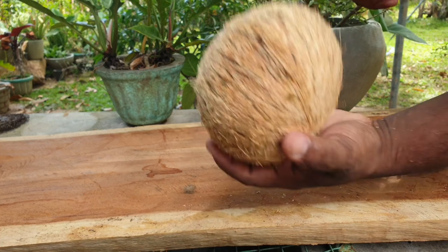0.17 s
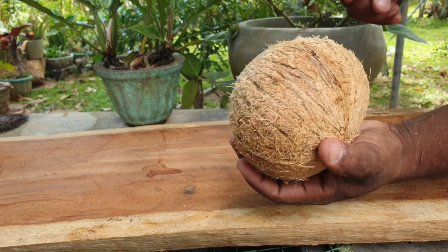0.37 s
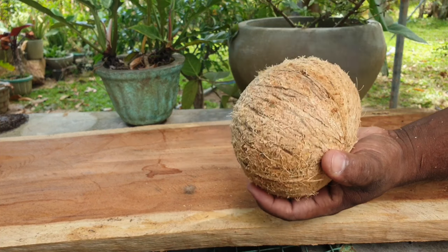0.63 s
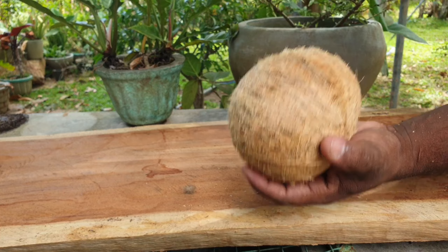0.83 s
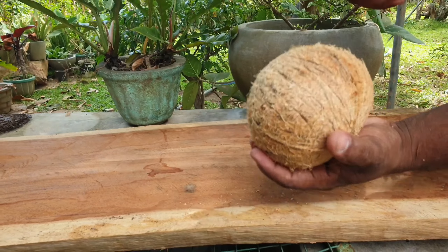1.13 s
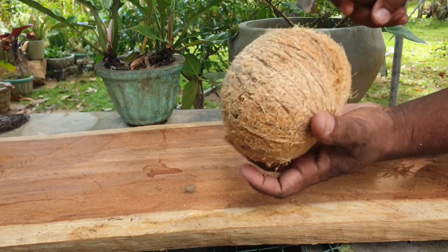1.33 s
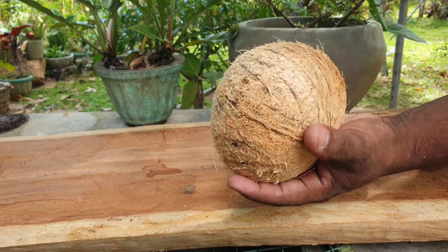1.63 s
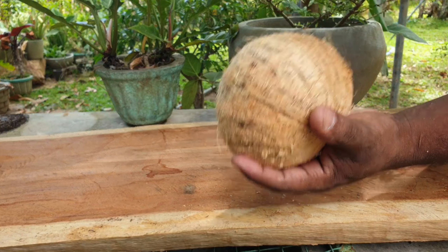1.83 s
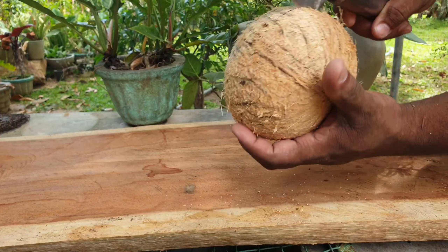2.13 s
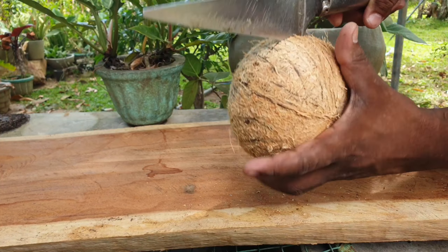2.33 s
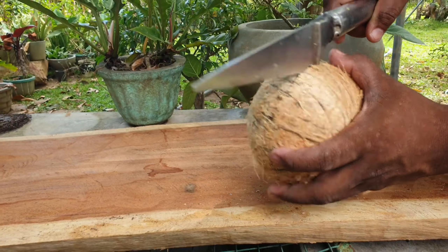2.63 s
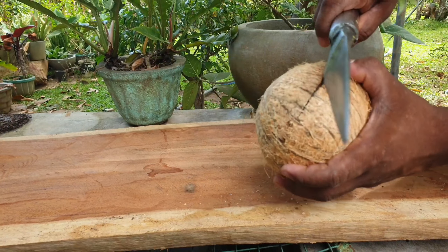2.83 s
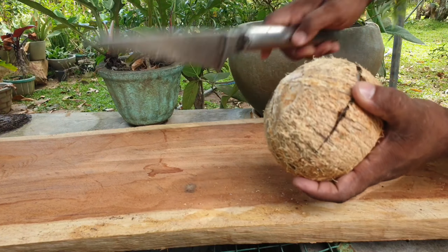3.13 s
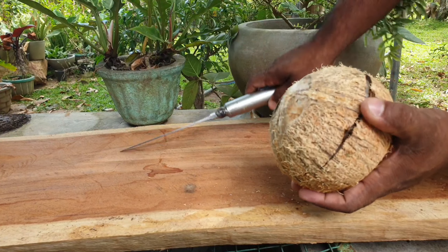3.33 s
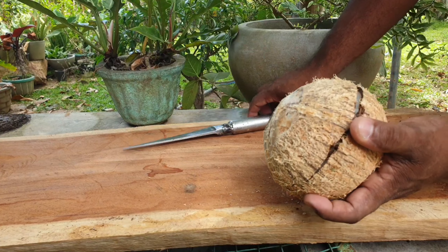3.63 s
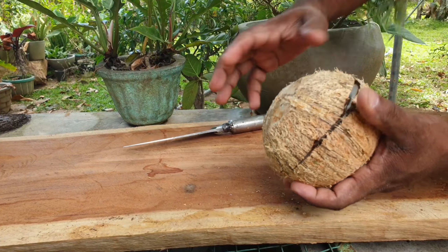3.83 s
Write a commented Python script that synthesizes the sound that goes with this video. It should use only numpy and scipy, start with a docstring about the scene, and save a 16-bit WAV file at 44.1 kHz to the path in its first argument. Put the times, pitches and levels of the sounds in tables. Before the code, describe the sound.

Knife chopping a coconut, close, on a covered porch. A previous blow's hollow ring fades at the start; a faint knock comes at 0.6 s, then hard cracks at 1.0 and 2.0 s, the second more hollow, with quick echoes. Tiny ticks and husk rustles follow, with creaks around 2.8-3.1 s. From 3.45 s the blade ticks and slides, thumping and bouncing on wood at 3.7-3.9 s. Faint garden hiss and wavering low hum throughout.

```python
"""Garden hiss and a wavering low hum run throughout; the tail of an earlier knife blow on a coconut rings first.
A faint knock and thin fizz follow, then two hard chops; each joins a noise crack to ringing shell, blade and pot.
Ticks and husk rustle (filtered noise) lie between; the blade creaks in the crack as rough pulses of noise.
Last, the knife slides and bounces on a wooden plank: fading tones of wood and steel, with noise for the contact.
A covered porch answers the knocks with a few hard echoes and a dense noise tail."""
import sys
import numpy as np
from scipy import signal
from scipy.fft import rfft, irfft
from scipy.io import wavfile

SR = 44100
rng = np.random.default_rng(int(sys.argv[2]) if len(sys.argv) > 2 else 0)


def undo_db(level):
    """Turn decibels back into plain size, where 20 dB means ten times bigger."""
    steps = np.asarray(level, float) / 20
    return 10 ** steps


def wrap_up_sound(samples):
    """Save the sound to the file named by the first command line argument, as 16-bit audio."""
    columns = np.atleast_2d(samples).T
    # keep every value between -1 and 1, then stretch to whole-number steps
    tamed = np.clip(columns, -1, 1)
    steps = np.round(tamed * 32767).astype(np.int16)
    wavfile.write(sys.argv[1], SR, steps)


N = 176400
LEAD = 4410  # samples worked out ahead of time zero, so that an earlier blow can ring in
TIME_S = (np.arange(N + LEAD) - LEAD) / SR

# In all tables t60_s is the time to fade by 60 dB.
# Garden hiss colour: pitch_hz, gain_db
AIR_COLOUR = [(15, -48.5), (25, -19.5), (49, -6), (70, -6.5), (121, -9.5), (232, -25.5), (259, -25.5),
              (538, -31.5), (651, -32), (1030, -35.5), (1180, -36.5), (3230, -48), (6210, -40.5),
              (8370, -63.5), (11000, -45.5), (15200, -53), (16500, -70)]
# Side tilt of the hiss, scaled where used: pitch_hz, left_minus_right_db
AIR_TILT = [(60, -2), (110, -0.5), (200, 2.5), (380, 6.5), (700, 8), (1290, 7.5), (2380, 19.5), (4400, 8.5),
            (8120, 8.5), (15000, -7)]
AIR_DB, AIR_ALIKE_HZ = -60.5, 506  # hiss level before the side tilt; both sides are alike below this pitch
# Strength of the low hum: time_s, level_db
HUM_LEVEL = [(0.0, -57.5), (0.16, -51), (0.55, -77), (0.59, -54.5), (0.73, -52.5), (0.93, -70),
             (0.992, -48), (1.089, -60.5), (1.23, -51), (1.36, -106), (1.68, -55), (1.72, -66.5),
             (2.0, -47), (2.27, -75), (2.46, -53.5), (2.92, -77), (2.97, -55), (3.29, -86.5), (3.449, -48),
             (3.6, -66)]
HUM_HZ = 62.9  # middle pitch
# Knife on coconut: start_s, crack_db (20 dB is added), shell_db, hollow_hz, hollow_db, hollow_t60_s,
# blade_db, porch_echo_db, crack_top_hz, pot_db
CHOPS = [(-.06, -17, -39, 764, -32, 0.09, -48, -5, 9300, -46.5),
         (0.6234, -47.5, -43, 612, -35.5, 0.036, -58, -11, 4970, -69.5),
         (0.9867, -13, -35.5, 590, -30, 0.051, -37.5, -3, 20030, -50),
         (1.9806, -9.5, -35.5, 700.4, -18.5, 0.088, -50, -10.5, 20240, -57)]
# Colour of the crack: pitch_hz, gain_db
CRACK_COLOUR = [(88, -43), (150, -12.5), (276, -10), (349, -5), (498, -10), (696, -2.5), (767, -12.5),
                (991, -8.5), (1140, -19), (2220, -6), (4420, -9), (6170, -8.5), (7810, -28.5), (11400, -12),
                (15600, -35), (16500, -47.5)]
# Tones of the coconut shell: pitch_hz, level_db, t60_s
SHELL = [(198, 1.5, 0.14), (296.5, -1, .18), (461.6, -6.5, 0.18), (844, -11.5, 0.22), (1200, 0, 0.012)]
# Tones of a big clay pot nearby that sings along: pitch_hz, level_db, t60_s
POT = [(306, -3, .6), (337.7, -1, 0.97), (371, -6.5, 1.1), (468, -8, 0.66), (764, -9, 0.57),
       (899, -10.5, .4), (2374, -1, .45), (2780, -9, .4)]
HELD_BLADE_HZ, HELD_BLADE_T60_S = 1835, 0.28  # the one ring of the gripped blade
# First hard echoes of the porch: delay_s, left_db, right_db
ECHOES = [(.0085, -6, -7.5), (0.0096, 0, -6.5), (0.0181, -7, -5.5), (0.0204, -5.5, -6)]
# Fading of the dense porch echo: pitch_hz, early_t60_s, late_t60_s, late_db
PORCH_DECAY = [(150, .1, 1, -18.5), (350, 0.18, 0.72, -16), (805, 0.15, .7, -17), (1390, .13, 0.63, -22.5),
               (2500, 0.15, 0.6, -15), (5900, 0.13, 0.5, -19), (12100, 0.19, 0.46, -16),
               (16000, 0.078, 0.18, -17.5)]
PORCH_RISE_S, PORCH_DENSE_DB = 0.0092, -21.5
# Faint, thin fizz near one pitch: centre_s, half_width_s, level_db
FIZZ = [(.7, 0.061, -68), (.89, 0.047, -71)]
FIZZ_HZ = 2790
# Fibres and grit ticking: start_s, level_db before filtering, pitch_hz
TICKS = [(0.917, -47.5, 3670), (1.502, -58, 6500), (1.588, -47, 8000), (2.7, -60, 10200),
         (2.935, -44, 5500)]
# Husk rubbing in the hand: centre_s, half_width_s, level_db before the two bands are evened out
RUBS = [(.95, .03, -73.5), (1.47, 0.036, -84), (1.62, 0.024, -74), (1.95, 0.021, -83), (2.45, 0.12, -78),
        (2.76, 0.034, -71.5), (2.92, 0.044, -72), (3.25, 0.046, -80.5)]
# Blade creaking in the crack: start_s, length_s, level_db, hollow_hz
CREAKS = [(2.828, 0.035, -71, 641), (2.876, 0.047, -61.5, 711), (2.912, 0.047, -61.5, 638),
          (3.038, .03, -69, 602)]
# Blade sliding on the wood: time_s, level_db (2.5 dB is added)
SLIDE_LEVEL = [(3.45, -86.5), (3.466, -72), (3.492, -81), (3.498, -67), (3.546, -84), (3.666, -86),
               (3.719, -57.5), (3.81, -77.5), (3.818, -64.5), (4.0, -86)]
# Colour of the slide: pitch_hz, gain_db
SLIDE_COLOUR = [(2060, -37), (3500, -9), (5000, -6), (6300, -5.5), (8100, -18.5), (10700, -10.5),
                (14600, -24.5), (16000, -37)]
# Knife laid down: start_s, edge_share (0 handle to 1 edge), plank_db, blade_db, tick_db, rattle_db, rattle_top_hz
TOUCHES = [(3.466, 1, -47.5, -41.5, -36.5, -57.5, 3000), (3.499, 1, -49, -43.5, -32, -50, 4000),
           (3.512, 1, -47.5, -49, -48, -50, 2010), (3.525, 1, -53, -46.5, -54, -53, 3000),
           (3.541, 1, -48, -51, -57, -50, 2010), (3.647, 0.12, -47.5, -75, -74, -55, 900),
           (3.658, 0.82, -54, -45.5, -52, -58, 3000), (3.683, 0.09, -23, -35.5, -38, -36, 1510),
           (3.793, 0.99, -27, -38.5, -45, -32, 2500), (3.809, 0.52, -31, -40.5, -60, -34, 1467),
           (3.855, 0.4, -37, -47, -69, -40, 1200), (3.905, 0.48, -37, -46.5, -72, -41, 1300)]
# Tones of the plank: pitch_hz, under_handle_db, under_edge_db, t60_s when not gripped
PLANK = [(146.4, -8.5, -9, 2.63), (200.5, -14, -8, 0.51), (256, -10.5, -9.5, 0.34),
         (300.7, -4.5, -10, 0.59), (386.4, -13.5, -10, 1.17), (491, -12.5, -4, 0.14),
         (642, -11.5, -9.5, 0.19), (742.7, 4, -8.5, 0.18), (939.5, -16, -0.5, 0.12),
         (1048, -22, -8.5, 0.12), (1172, -19, -6.5, 0.052), (1350, -11.5, -4, 0.095),
         (1617, -23.5, -2.5, 0.19), (1920, -29, 0, 0.048), (2188, -26, -9.5, 0.091), (2338, -24, 7, 0.025)]
# Tones of the knife blade: pitch_hz, struck_at_handle_db, struck_at_edge_db, t60_s when not gripped
BLADE = [(858, -6.5, -17, 0.95), (1300, -6, -3.5, 0.37), (1610, -5.5, -13, 0.2), (1820, -13.5, -11, 0.61),
         (2333, -15, -3, 0.15), (3033, -8.5, -12, 0.47), (3390, -46, -14.5, 0.24), (3733, -17, -18, 0.11),
         (4300, -36, -25, .1), (4723, -29, -18.5, 0.71), (5130, -4, -19, 0.11), (5960, -39, -12, .1),
         (6300, -38, -11.5, 0.14)]
HELD_SHARE, LET_GO_S = 0.56, 3.67  # share of ring time left while gripped; when the hand opens
CHOKE_DB = -10  # change in the blade's ring at each later touch
PLANK_PAN_DB, PORT_LAG_S = -4, .00008  # knife on plank, left minus right; delay of near sounds on the right
# Side tilt of all but the garden sounds and fizz, shared between the ports: pitch_hz, left_minus_right_db
PORT_TILT = [(60, -3), (110, -4), (200, -1), (380, 2), (700, 3.5), (1290, 10), (2380, 5.5), (4400, 10),
             (8120, 7), (15000, 2)]


def table(points, hz):
    """Reads (pitch, value) points, spacing the pitches as the ear does (log scale)."""
    p = np.array(points, float)
    return np.interp(np.log(hz + 1), np.log(p[:, 0]), p[:, 1])


def colour(x, points, share=1):
    """Filters by a share of the (pitch, dB) points, with no sound before its cause."""
    log_gain = share * table(points, np.arange(1025) * SR / 2048) * np.log(10) / 20
    # Folding the cepstrum onto positive times gives a minimum-phase filter
    cepstrum = irfft(log_gain)
    cepstrum[1:1024] *= 2
    cepstrum[1025:] = 0
    return signal.fftconvolve(x, irfft(np.exp(rfft(cepstrum))))[:len(x)]


def band(x, lo_hz, hi_hz):
    """Keeps the pitches between two limits."""
    limits = [lo_hz, min(hi_hz, SR * .49)]
    return signal.sosfilt(signal.butter(2, limits, "band", fs=SR, output="sos"), x)


def unit(x):
    """Scales to an rms of 1."""
    return x / np.sqrt(np.mean(x ** 2))


def add(track, s, sound):
    """Mixes a sound in at s seconds."""
    i = LEAD + int(round(s * SR))
    track[i:i + len(sound)] += sound[:len(track) - i]


def burst(decay_s):
    """A short spit of noise that dies away exponentially."""
    t = np.arange(8192) / SR
    return rng.standard_normal(len(t)) * np.exp(-t / decay_s)


def white(x):
    """Evens out the spectrum but keeps its phases, then fades the result."""
    flat = irfft(np.exp(1j * np.angle(rfft(x))))
    return flat * np.exp(-np.arange(len(x)) / (0.0043 * SR))


def plain_noise():
    """Plain white noise of steady level, as long as the whole track."""
    return rng.standard_normal(N + LEAD)


def swells(rows):
    """Bell-shaped level bumps; the half width is where a bump has sunk to 1/e."""
    return sum(undo_db(db) * np.exp(-((TIME_S - s) / half_s) ** 2) for s, half_s, db in rows)


def ring(modes, contact_hz=8000., scatter_db=2.0, rough_db=3.5):
    """A blow sets tones fading; loose contact makes each flutter, slow contact softens the start and highs."""
    t = np.arange(SR) / SR
    hz, db, t60 = np.array(modes, float).T[:, :, None]
    scatter, sign = rng.standard_normal((2, len(hz), 1))
    knots = np.arange(64) / 60  # 60 random steps a second
    steps = rng.standard_normal((2, len(hz), 64))
    flutter, slip = (np.array([np.interp(t, knots, row) for row in rows]) for rows in steps)
    grow = np.clip(t / 0.027, 0, 1) * rough_db  # the flutter sets in over 27 ms
    gain = np.sign(sign) * undo_db(db + scatter_db * scatter + grow * flutter)
    gain = gain / (1 + (hz / contact_hz) ** 2) * (1 - np.exp(-t * contact_hz))
    tone = np.sin(2 * np.pi * hz * t + 0.19 * grow * slip)
    return (gain * tone * np.exp(-np.log(1000) * t / t60)).sum(axis=0)


def garden_hiss():
    """Steady coloured noise, alike at both ports only in the bass."""
    both, left, right = rng.standard_normal((3, N + LEAD))
    low = signal.butter(1, AIR_ALIKE_HZ, fs=SR)
    # Swap each side's own bass for the shared bass
    air = [unit(colour(signal.lfilter(*low, both - own) + own, AIR_COLOUR)) for own in (left, right)]
    tilted = [colour(air[0], AIR_TILT, share=0.55), colour(air[1], AIR_TILT, share=-0.18)]
    return undo_db(AIR_DB) * np.array(tilted)


def low_hum():
    """One sine whose pitch wavers at random and whose level rises and falls; it is later on the right."""
    time_s, level_db = np.array(HUM_LEVEL).T
    waver = unit(band(plain_noise(), 0.3, 8.2))
    cycles = np.cumsum(HUM_HZ * (1 + 0.06 * waver)) / SR
    hum = np.sqrt(2) * np.sin(2 * np.pi * cycles) * undo_db(np.interp(TIME_S, time_s, level_db))
    return np.array([undo_db(-1.5) * hum, undo_db(1.5) * np.roll(hum, int(0.0014 * SR))])


def chops():
    """Each blow: a noise crack, ringing shell, hollow note and gripped blade; the pot hums along, near only."""
    near, far = np.zeros((2, N + LEAD))
    for (s, crack_db, shell_db, hollow_hz, hollow_db, hollow_t60,
         blade_db, echo_db, top_hz, pot_db) in CHOPS:
        crack = band(colour(white(burst(0.0011)), CRACK_COLOUR), 40, top_hz)
        blow = undo_db(shell_db) * ring(SHELL)
        blow += ring([(hollow_hz, hollow_db, hollow_t60)], scatter_db=0.5, rough_db=3.)
        blow += ring([(HELD_BLADE_HZ, blade_db, HELD_BLADE_T60_S)], scatter_db=-1, rough_db=2.5)
        blow[:len(crack)] += undo_db(crack_db) * crack / np.sqrt(np.sum(crack ** 2)) * 10
        add(near, s, blow + undo_db(pot_db) * ring(POT, rough_db=3., contact_hz=4000))
        add(far, s, undo_db(echo_db) * blow)
    return near, far


def porch():
    """Walls and roof: a few hard echoes, and dense noise dying fast and then slowly, band by band."""
    t, out = np.arange(SR) / SR, np.zeros((2, SR))
    decay = np.array(PORCH_DECAY)
    for c in range(2):
        for hz in 90 * 2 ** np.arange(0, 8, .5):  # half-octave bands
            early = np.exp(-np.log(1000) * t / table(decay[:, [0, 1]], hz))
            late = np.exp(-np.log(1000) * t / table(decay[:, [0, 2]], hz))
            fall = early + undo_db(table(decay[:, [0, 3]], hz)) * late
            out[c] += band(rng.standard_normal(SR), hz / 2 ** .25, hz * 2 ** .25) * fall
        out[c] *= undo_db(PORCH_DENSE_DB) * np.clip(t / PORCH_RISE_S, 0, 1)
        for s, *db in ECHOES:
            out[c, int(s * SR):][:8192] += undo_db(db[c]) * white(burst(0.00033))
    return out


def faint_fizz():
    """Noise squeezed into a narrow band, swelling briefly."""
    return swells(FIZZ) * unit(band(plain_noise(), FIZZ_HZ * .96, FIZZ_HZ * 1.025))


def ticks():
    """Fibres and grit tick: tiny bursts of noise around one pitch."""
    out = np.zeros(N + LEAD)
    for s, db, hz in TICKS:
        add(out, s, undo_db(db) * band(burst(0.0022), hz * .75, hz * 1.25))
    return out


def husk_rubs():
    """The husk rustles in the hand: uneven noise in two treble bands, swelling and sinking."""
    husk = plain_noise() * undo_db(3.5 * plain_noise())  # loudness jumps from sample to sample
    return swells(RUBS) * unit(band(husk, 6500, 6700) + undo_db(-5.5) * band(husk, 9500, 10000))


def creaks():
    """The blade slips in the crack: spiky noise rings the hollow nut, with a fainter rasp above."""
    out = np.zeros(N + LEAD)
    count = int(.1 * SR)
    for s, long_s, db, hz in CREAKS:
        hump = np.sin(np.pi * np.clip(np.arange(count) / (long_s * SR), 0, 1)) ** 2
        slips = rng.standard_normal(count) ** 3 * np.sqrt(hump + 1e-9)
        hollow = unit(band(slips, hz * 0.873, hz * 1.078))
        rasp = unit(band(slips, 1030, 2460))
        add(out, s, undo_db(db) * (hollow + undo_db(-13) * rasp))
    return out


def blade_slide():
    """The blade slides on the wood: uneven, coloured noise that follows a level curve."""
    time_s, level_db = np.array(SLIDE_LEVEL).T
    grit = colour(plain_noise() * undo_db(3 * plain_noise()), SLIDE_COLOUR)
    return unit(grit) * undo_db(np.interp(TIME_S, time_s, level_db, left=-120) + 2.5)


def knife_on_plank():
    """Each touch rings plank and blade with noise; grip shortens both, later touches deaden the blade."""
    out = np.zeros(N + LEAD)
    t = np.arange(SR) / SR
    times = np.array(TOUCHES)[:, 0]
    for s, edge, plank_db, blade_db, tick_db, rattle_db, top_hz in TOUCHES:
        grip = HELD_SHARE if s < LET_GO_S else 1
        # Blend the handle and edge levels by where the knife touches
        wood, steel = ([(hz, a + edge * (b - a), t60 * grip) for hz, a, b, t60 in modes]
                       for modes in (PLANK, BLADE))
        touched = sum(np.clip((t + s - later) / .004, 0, 1) for later in times[times > s])
        choke = undo_db(CHOKE_DB * touched + 0 * t)
        add(out, s, undo_db(plank_db) * ring(wood, contact_hz=3000, rough_db=2.5))
        add(out, s, undo_db(blade_db) * choke * ring(steel, rough_db=2., scatter_db=3.0))
        tick = band(band(burst(0.0045), 2000, 8100), 1500, 7000)
        tick += undo_db(-12) * band(burst(0.0015), 9000, 13700)
        rattle = band(band(burst(0.024), 300, top_hz), 170, top_hz)
        add(out, s, undo_db(tick_db) * tick + undo_db(rattle_db) * rattle)
        add(out, s, undo_db(plank_db + 2.5) * band(burst(0.071), 165, 810))  # dull wooden thud
    return out


def scene():
    """Near sounds reach the right port a little late; the porch echoes them; the garden lies underneath."""
    garden = garden_hiss() + low_hum() + faint_fizz()
    near, far = chops()
    small = ticks() + husk_rubs() + creaks()
    slide, knife = blade_slide(), knife_on_plank()
    pan = undo_db(np.array([[PLANK_PAN_DB], [-PLANK_PAN_DB]]) / 2)
    direct = near + small + (knife + slide) * pan
    direct[1] = np.roll(direct[1], int(PORT_LAG_S * SR))
    to_porch = far + undo_db(-17) * small + undo_db(-12) * knife + undo_db(-4) * slide
    echoed = signal.fftconvolve(to_porch[None], porch(), axes=1)[:, :N + LEAD]
    left = colour(direct[0] + echoed[0], PORT_TILT, share=0.7)
    right = colour(direct[1] + echoed[1], PORT_TILT, share=-0.29)
    return (np.array([left, right]) + garden)[:, LEAD:]


def low_pass(x):
    """Removes everything above the highest recorded frequency."""
    return signal.sosfilt(signal.butter(12, 16880, fs=SR, output="sos"), x)


def record(dry):
    """The phone rounds off the loudest peaks and cuts the top above 16500 Hz."""
    rounded = np.tanh(1.228 * dry) / 1.173
    top_cut = signal.ellip(8, .2, 60, 16500, fs=SR, output="sos")
    mix = signal.sosfilt(top_cut, rounded)
    return low_pass(mix)


dry = scene()
out = record(dry)
wrap_up_sound(out)
```